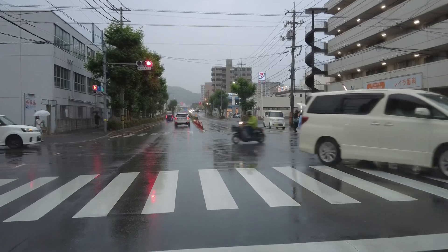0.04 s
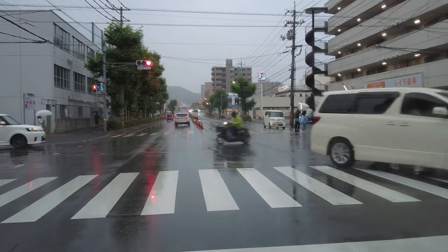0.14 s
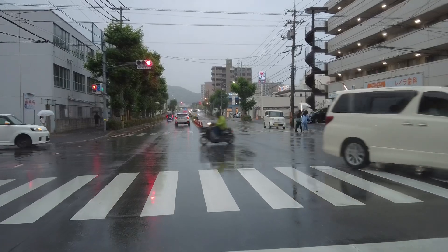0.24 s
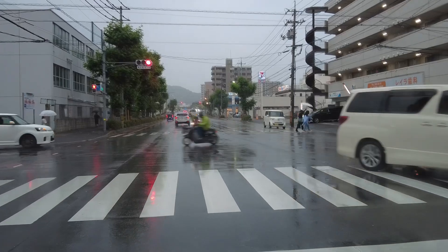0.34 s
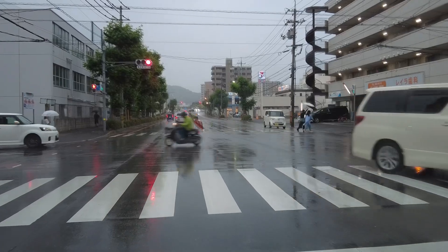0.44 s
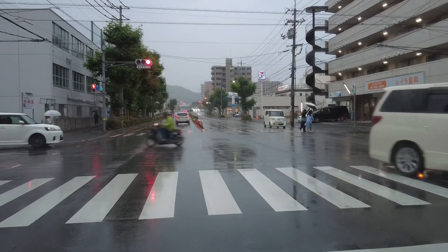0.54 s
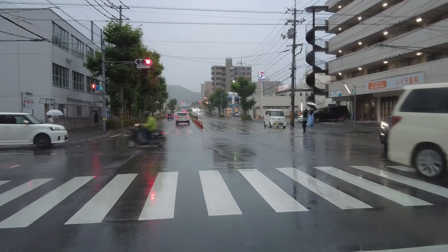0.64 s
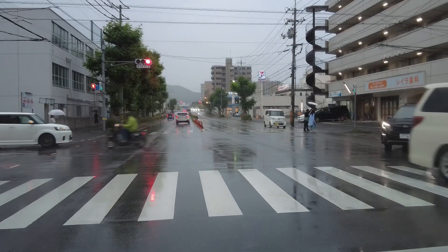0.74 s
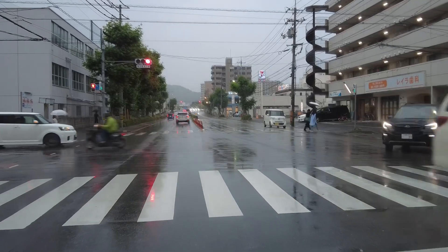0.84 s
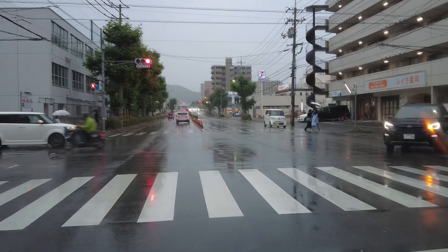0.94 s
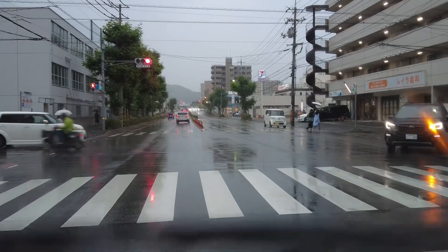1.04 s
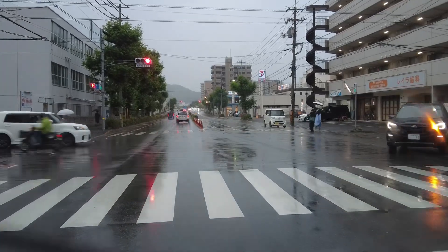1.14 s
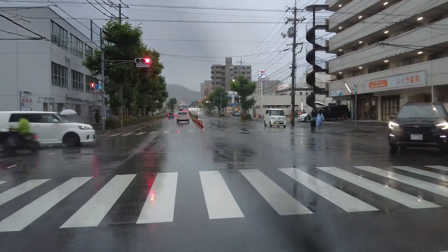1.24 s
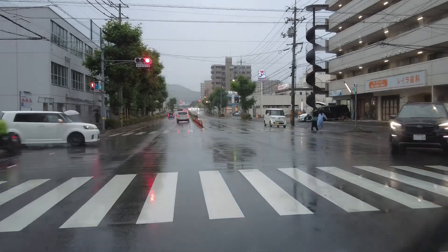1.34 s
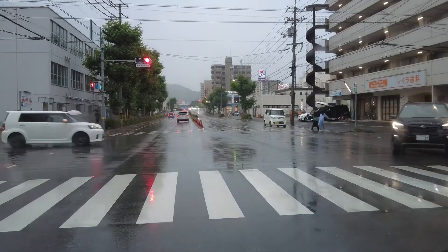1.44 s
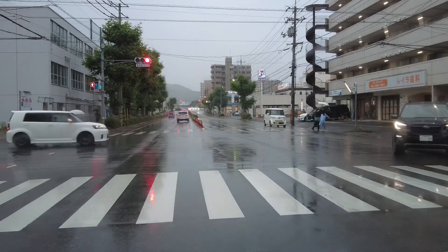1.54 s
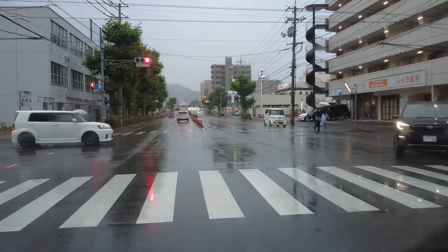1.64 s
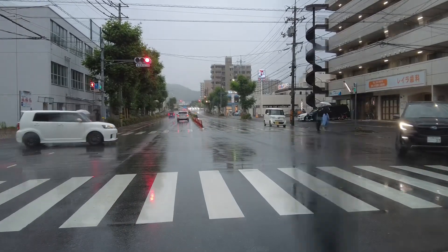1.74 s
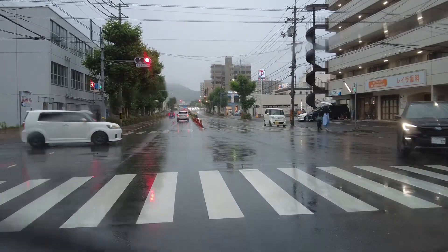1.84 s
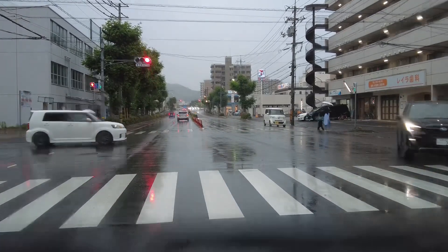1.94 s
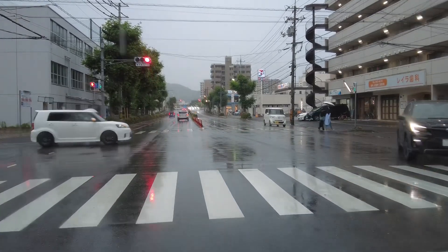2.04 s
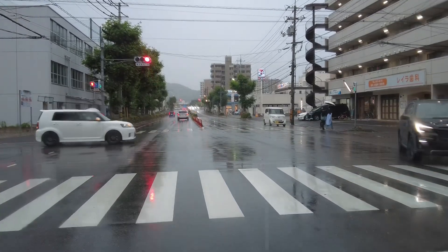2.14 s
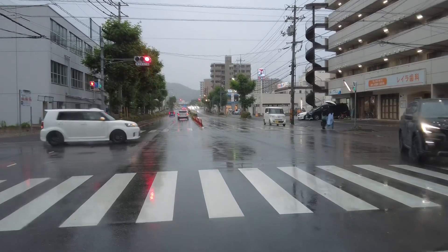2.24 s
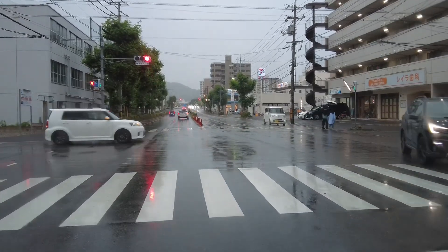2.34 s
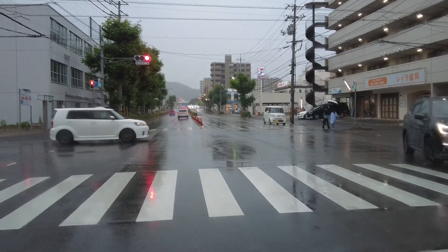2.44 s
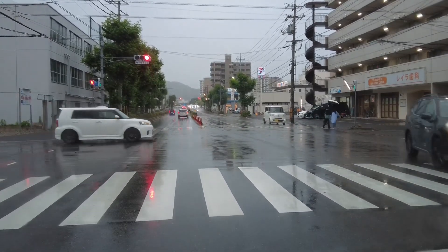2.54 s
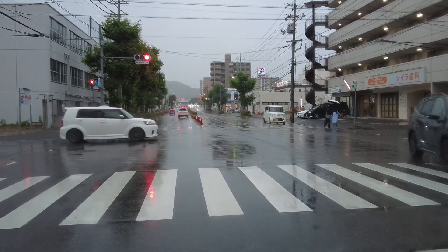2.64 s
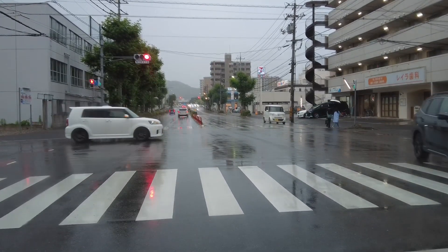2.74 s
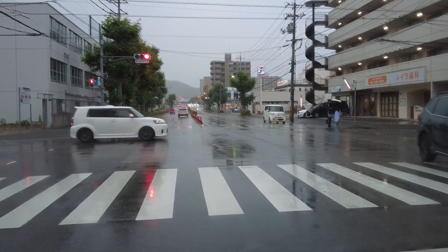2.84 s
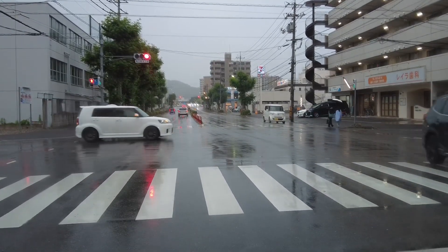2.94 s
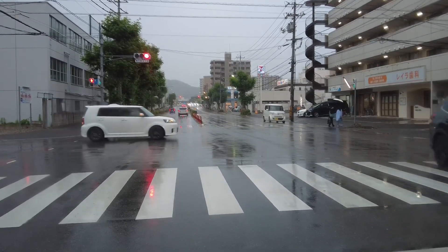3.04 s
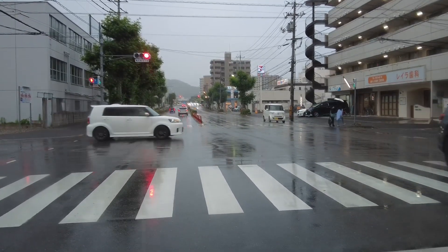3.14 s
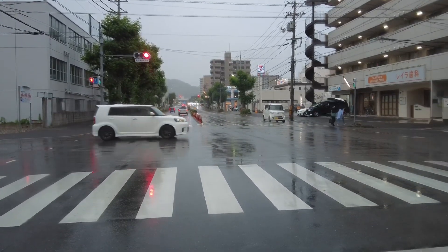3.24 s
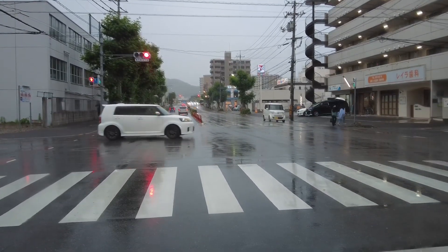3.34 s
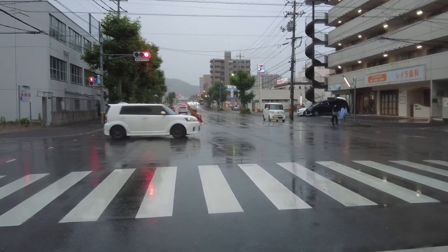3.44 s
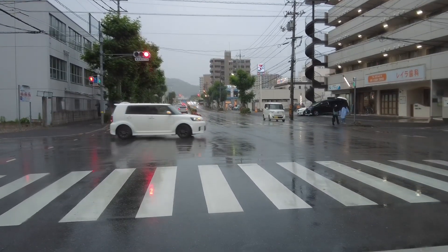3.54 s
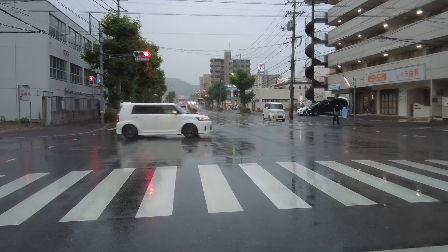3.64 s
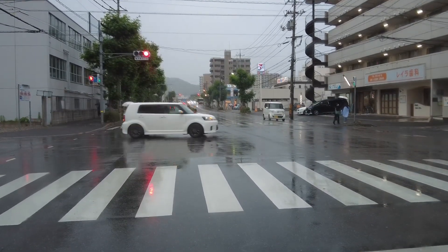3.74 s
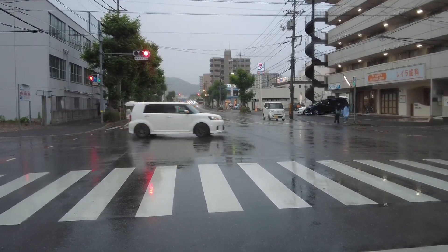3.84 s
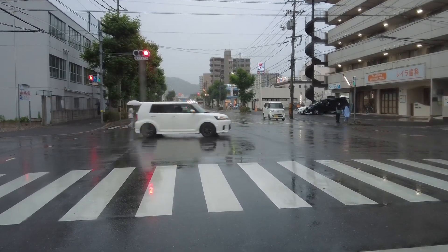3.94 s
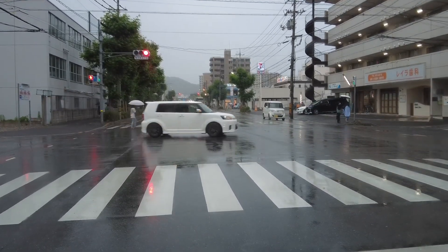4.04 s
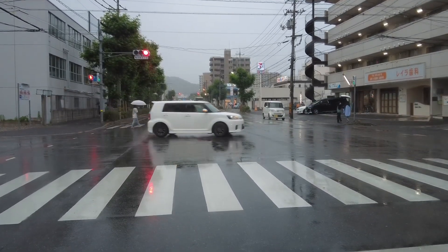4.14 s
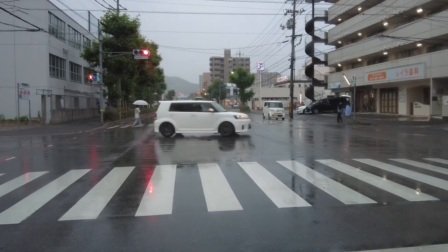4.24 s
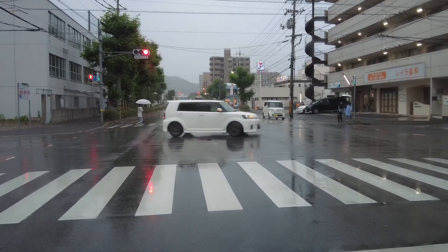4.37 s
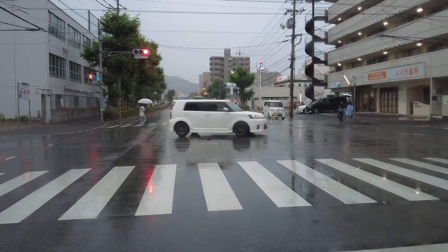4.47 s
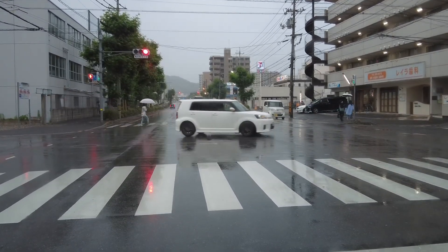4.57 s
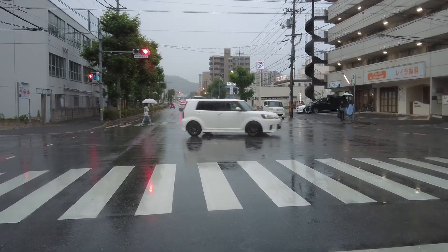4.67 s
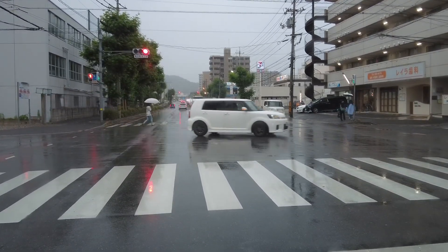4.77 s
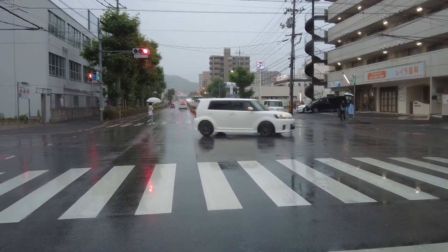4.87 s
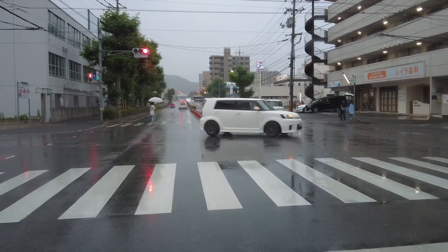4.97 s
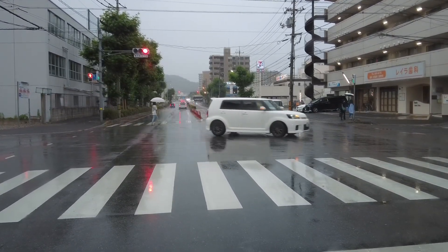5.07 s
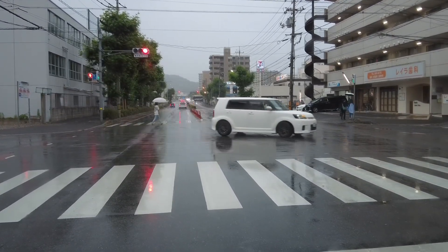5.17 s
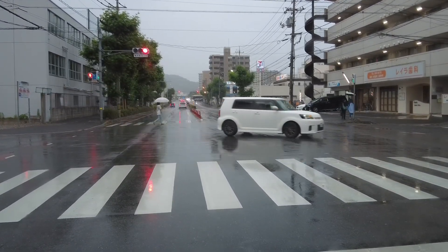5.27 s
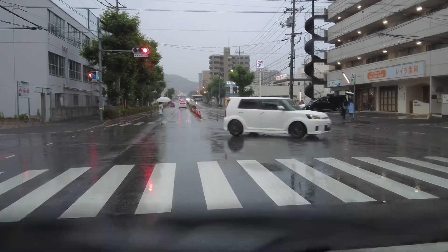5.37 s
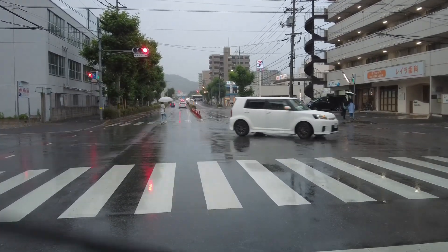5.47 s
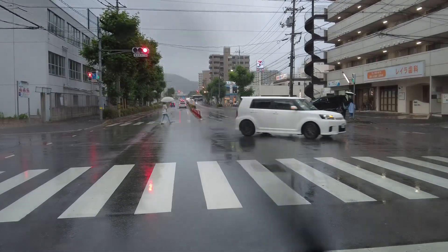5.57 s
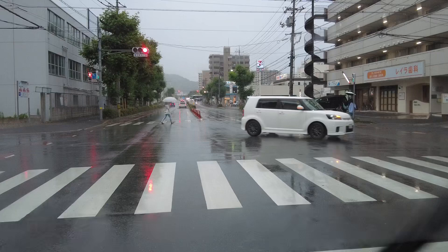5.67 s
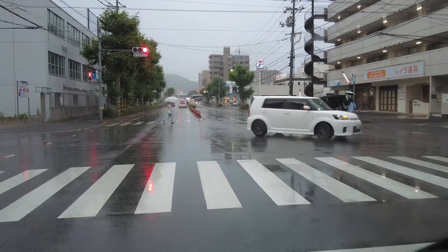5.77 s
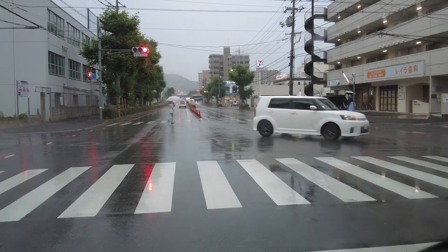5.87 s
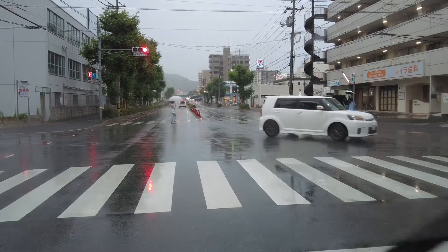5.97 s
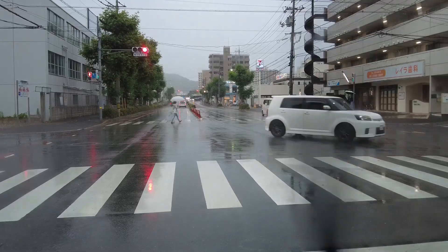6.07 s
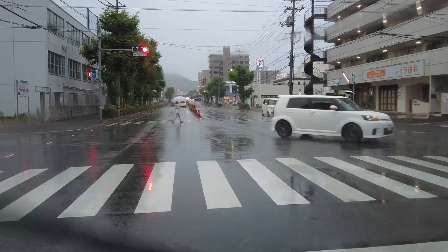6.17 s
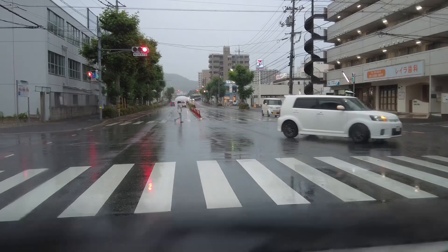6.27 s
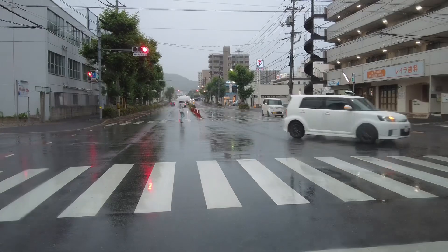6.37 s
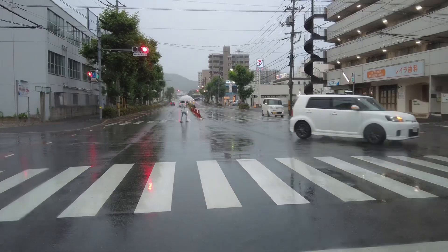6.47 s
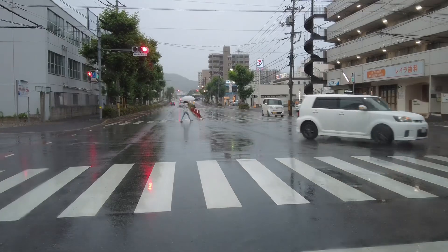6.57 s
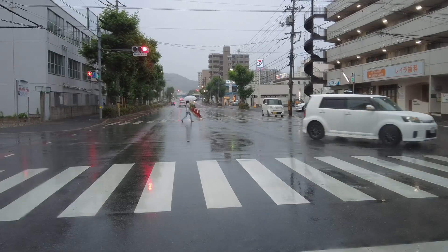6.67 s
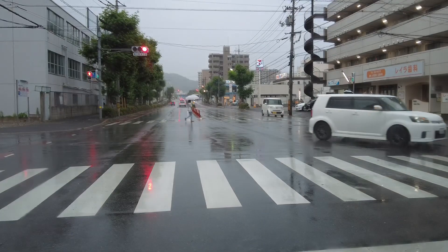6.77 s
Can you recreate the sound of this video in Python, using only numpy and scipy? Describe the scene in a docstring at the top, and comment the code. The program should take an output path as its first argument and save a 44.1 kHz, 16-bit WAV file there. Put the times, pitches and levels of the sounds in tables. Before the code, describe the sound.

Windscreen wipers sweep twice with a motor whine and rubbery knocks, inside an idling car with faint rain outside.

```python
"""Windscreen wipers sweep up and back twice, heard inside a car idling at a wet crossing. Their geared motor
whines, a relay clicks as each sweep starts, the rubber sticks and slips on the glass, and the blades slap and
knock as they lift off, flip over and park, setting glass, cowl and linkage ringing. Underneath, the engine
throbs at harmonics of its firing rate. Rain and tyre hiss come through the glass and one vehicle passes with a
rising tone; later a faint hum swells briefly and a few big drops strike the roof."""
import sys
import numpy as np
from scipy import signal
from scipy.fft import rfft, irfft, next_fast_len
from scipy.io import wavfile

SR = 44100
rng = np.random.default_rng(int(sys.argv[2]) if len(sys.argv) > 2 else 0)


def file_out(sig):
    """Save sig as 16-bit WAV at sys.argv[1]."""
    # one column per channel
    cols = np.atleast_2d(sig).T
    # limit, then scale
    lim = np.clip(cols, -1, 1)
    pcm = np.round(lim * 32767).astype(np.int16)
    wavfile.write(sys.argv[1], SR, pcm)


N = 300321

# rain and wet traffic outside: time_s, rumble_db, hiss_db
OUTSIDE_LEVELS = [(0.0, -50.5, -64), (0.88, -48, -63.5), (2.27, -46, -63), (2.56, -50.5, -63.5),
                  (3.01, -48, -63), (3.8, -50.5, -64.5), (4.4, -50, -64.5), (4.8, -50.5, -65.5),
                  (5.2, -50.5, -65), (6.5, -51, -69), (6.8, -50.5, -65.5)]
# spectra of that rumble and hiss: frequency_hz, density_db
RUMBLE_SPECTRUM = [(65, -41), (95, 6), (110, -12), (126, -13.5), (145, -3), (162, -6.5), (194, -5),
                   (259, -9), (360, -11.5), (416, -19), (594, -16), (1100, -32), (1430, -65), (2420, -120)]
HISS_SPECTRUM = [(800, -6), (1100, -2.5), (1400, 1.5), (1700, -0.5), (2100, -4), (2700, -1.5), (3300, -7.5),
                 (4000, -10), (5000, -13), (6200, -20), (7700, -18.5), (9000, -29), (10000, -21),
                 (11800, -36.5)]
# big drops on the roof: start_s, level_db, pitch_hz, decay_s
ROOF_DROPS = [(3.332, -61, 1500, 0.0057), (3.719, -72, 9200, 0.013), (3.825, -72, 8800, 0.022),
              (4.371, -60.5, 3280, 0.01), (4.372, -68.5, 9000, 0.015), (4.701, -58.5, 3270, 0.012),
              (4.715, -63.5, 2600, 0.012)]
# a passing vehicle, then a faint hum near 235 Hz, probably an overtone of the idling engine:
# start_s, end_s, start_hz, end_hz, level_db
BRIEF_TONES = [(0.097, 0.883, 167, 222.5, -59.5), (2.235, 2.918, 227.2, 237.7, -56.5)]
# cabin air between the engine orders: frequency_hz, density_db
BOOM_SPECTRUM = [(15, -11.5), (24, 5), (34, 4), (45, 3.5), (58, -25.5), (70, -14), (80, -22),
                 (100, -12.5), (120, -39.5), (140, -34)]
# idling engine, slowly settling: time_s, firing_hz, first_order_db, second_order_db
IDLE_CURVE = [(0.0, 23.75, -26, -30.5), (0.58, 23.95, -27.5, -31.3), (1.04, 23.55, -27, -34),
              (1.5, 23.45, -27, -30), (1.96, 23.2, -22, -32), (2.42, 23.25, -23, -30.5),
              (2.88, 22.92, -30, -32), (3.11, 22.97, -25, -32), (3.8, 23.22, -25, -32),
              (4.26, 22.72, -26, -32), (4.72, 22.85, -23.5, -32), (5.18, 22.58, -24.5, -31),
              (5.64, 22.65, -24, -28), (6.1, 22.46, -23.7, -27), (6.81, 22.76, -23.3, -27.5)]
# higher engine orders: multiple, level_db
ENGINE_ORDERS = [(3, -42), (4, -46.5), (6, -55), (8, -64)]
# wiper motor, one list a sweep: time_s, gear_hz, second_db, third_db, fourth_db
MOTOR_RUNS = [
    [(.91, 480, -62, -63, -72), (1.07, 492.3, -89, -65.5, -64.5), (1.18, 506.2, -78, -60.5, -68),
     (1.27, 505.3, -75, -55.5, -87), (1.3, 541.5, -71, -70, -68), (1.48, 561, -54, -61, -69),
     (1.72, 545.5, -62, -63, -71), (1.8, 552, -64, -58.5, -70), (1.95, 572, -58, -60, -71),
     (2.02, 566, -60, -61, -67), (2.13, 578.6, -46.5, -64, -69)],
    [(5.25, 485.4, -68, -63, -72), (5.38, 512, -86, -62.5, -67), (5.48, 487, -70, -59.5, -65),
     (5.61, 505.5, -69, -57.5, -86), (5.64, 549, -77, -77, -64), (5.74, 560.7, -61, -62.5, -69.5),
     (5.92, 562, -67, -62, -76), (6.01, 548, -84, -57, -68), (6.08, 543, -75, -63, -74),
     (6.14, 550, -68, -55, -68.5), (6.28, 570, -64, -61, -69), (6.36, 568, -59, -65, -70),
     (6.465, 560, -47, -56, -82)],
]
# modes of the motor housing: pitch_hz, level_db, t60_s
HOUSING_MODES = [(1313, -69, 0.065), (3500, -79.5, 0.05), (4795, -81, 0.045)]
# one sweep, up and back: time_s, shake_db, drag_db, film_db
SWEEP_LEVELS = [(0.88, -48.5, -32.5, -64), (0.975, -28.5, -42.5, -64), (1.04, -33, -46.5, -63),
                (1.15, -26, -49.5, -62), (1.3, -27.5, -55.5, -63.5), (1.4, -29, -49.5, -59),
                (1.49, -41.5, -46.5, -61.5), (1.64, -19, -36, -62), (1.71, -31, -43.5, -61),
                (1.77, -26, -48, -61.5), (1.96, -30, -45, -60.5), (2.09, -32.5, -46, -60.5),
                (2.15, -27.5, -40, -54), (2.24, -32.5, -54.5, -70)]
# spectra of body shake, rubber drag, water film and wet slap: frequency_hz, density_db
SHAKE_SPECTRUM = [(22, -11.5), (30, 12.5), (38, 1), (50, 4), (62, 1.5), (100, -11), (130, -48)]
DRAG_SPECTRUM = [(71, -39.5), (120, -0.5), (194, 3.5), (241, -8.5), (318, -5), (431, -13), (580, -11),
                 (649, -43.5), (711, -6.5), (1100, -45.5), (1430, -52), (2420, -120)]
FILM_SPECTRUM = [(800, -26), (1100, 1), (1400, -1), (1700, 0.5), (2100, -10.5), (2700, -6), (3300, -14),
                 (4000, -9.5), (5000, -24), (6200, -19), (7700, -19), (9000, -21.5), (10000, -35.5),
                 (11800, -27.5)]
SLAP_SPECTRUM = [(400, -2.5), (1000, 16.5), (2000, 4.5), (3500, -9.5), (6000, -22), (11500, -31)]
# modes of glass, cowl and linkage: pitch_hz, level_db, t60_s
COWL_MODES = [(213.1, -6.5, 0.16), (251, -5.5, 0.14), (293.5, -1.5, 0.2), (350, 4, 0.037),
              (379, 1.5, 0.086), (452, -3.5, 0.12), (582, -1, 0.064), (705.7, 0, 0.073), (818, 3.5, 0.066),
              (1224, 5, 0.048), (1376, 1, 0.04), (1717, -4, 0.038), (1682, -9.5, 0.069),
              (1820, -12.5, 0.069), (2100, -9.5, 0.022), (2300, -1.5, 0.024), (2773, -7.5, 0.045),
              (3250, -7.5, 0.012), (3540, -13, 0.0052), (4330, -14.5, 0.012), (5500, -12, 0.014),
              (7450, -15.5, 0.01), (7860, -8.5, 0.01), (9000, -13.5, 0.01), (10600, -23.5, 0.012)]
# blade and linkage knocks, with a relay click at the start of each sweep (0.904 s and 5.243 s), the last three
# columns relative to the thump: start_s, thump_db, thump_hz, middle_db, bright_db, snap_db
BLADE_KNOCKS = [(0.904, -33, 252.5, -11.5, -30.5, -17.5), (0.965, -38, 269, -1.5, -13.5, -37),
                (1.416, -38.5, 225, -2, -18.5, -29), (1.486, -32.5, 196.5, -6, -14.5, -35.5),
                (1.494, -37.5, 354, 8, -18.5, -28), (1.499, -24.5, 349, -5, -21, -36),
                (1.529, -29, 465, -1, -7, -21.5), (1.536, -28.5, 303, -8.5, -15.5, -27),
                (1.545, -27, 396, -8, -15.5, -28), (1.556, -22.5, 286, -20, -20, -37.5),
                (1.57, -31.5, 288, -18.5, -19, -36), (1.592, -31, 253, -25.5, -28, -38),
                (1.612, -32, 235, -22.5, -19, -28), (1.635, -33.5, 301, -18.5, -32.5, -46.5),
                (1.655, -35, 272, -21, -26.5, -41), (1.679, -32, 295, -25.5, -17.5, -42),
                (1.952, -33, 312, -7.5, -36.5, -29), (2.111, -35.5, 304, -7, -13, -30.5),
                (2.118, -19.5, 205, -14.5, -12, -21.5), (2.122, -19, 383, -16.5, -16, -18.5),
                (2.128, -24, 408, -14.5, -19, -26.5), (2.142, -23.5, 209, -15.5, -25, -36),
                (5.243, -33.5, 250, -13, -30, -16), (5.292, -39, 314, -11, -19.5, -37.5),
                (5.309, -39.5, 263.5, -4, -17.5, -30.5), (5.748, -43, 219, 0, -20, -23.5),
                (5.776, -42, 331, -13, -21.5, -24), (5.822, -38.5, 223, -2, -13.5, -32),
                (5.832, -26, 348, -2.5, -18, -36), (5.838, -24, 347, -6.5, -17, -41),
                (5.851, -32.5, 303, -1.5, -23, -39), (5.867, -31.5, 401, -1, -7, -22),
                (5.875, -29, 332, 0.5, -11, -23), (5.884, -33, 297, -6, -11.5, -25),
                (5.897, -28.5, 246, -11.5, -18, -35.5), (5.91, -26, 261, -16, -18.5, -35.5),
                (5.937, -30, 270, -26.5, -27.5, -42), (5.955, -31.5, 257, -24.5, -26.5, -40),
                (5.977, -36.5, 279, -27.5, -35.5, -40), (6, -39.5, 231, -27, -30.5, -42),
                (6.289, -37, 307, -6.5, -39, -30), (6.457, -21, 214.5, -20, -11, -17),
                (6.461, -21, 380, -17, -12.5, -28), (6.469, -28, 227.5, -15, -15, -30.5),
                (6.481, -22.5, 207.4, -23, -28.5, -43)]
# left-right difference relative to the sum: frequency_hz, gain_db
SIDE_GAIN = [(20, -1), (60, -22.5), (140, -13.5), (220, -17.5), (330, -12.5), (510, -2.5), (770, -2.5),
             (1050, 4), (1300, -6.5), (1820, -5), (2780, -0.5), (4500, 3.5), (8000, -1.5), (11000, 0)]
# interference of left and right in the sum: centre_hz, width_hz, gain_db
SUM_INTERFERENCE = [(1104, 60, -7.5), (1815, 13, 0.5), (7030, 220, -7)]
# left relative to right: frequency_hz, gain_db
BALANCE = [(20, -5.5), (46, -1), (70, -1.5), (200, 0), (700, 1.5), (2000, 0), (5000, 0)]

SWEEP_INTERVAL_S = 4.337


def from_db(db):
    """Decibels to amplitude ratio."""
    return 10 ** (np.asarray(db) / 20)


def unit_rms(x):
    """Normalise to unit mean power."""
    return x / np.sqrt(np.mean(x ** 2) + 1e-20)


def in_time(rows):
    """Interpolate each column linearly at every sample."""
    time_s, *columns = np.transpose(rows)
    return np.array([np.interp(np.arange(N) / SR, time_s, column) for column in columns])


def at_hz(spectrum, hz):
    """Interpolate a spectrum on a log-frequency axis."""
    points_hz, db = np.transpose(spectrum)
    return np.interp(np.log(hz), np.log(points_hz), db)


def during(tables, fade_s):
    """Trapezoidal gate over the time span of each table."""
    t = np.arange(N) / SR
    return sum(np.clip(np.minimum(t - rows[0][0], rows[-1][0] - t) / fade_s, 0, 1) for rows in tables)


def drift(rate_hz):
    """Low-pass noise: a random fluctuation of unit rms."""
    step = 40
    pole = np.exp(-2 * np.pi * step * rate_hz / SR)
    slow = signal.lfilter([1], [1, -2 * pole, pole ** 2], rng.standard_normal(N // step + 2002))[2000:]
    return np.interp(np.arange(N) / step, np.arange(len(slow)), unit_rms(slow))


def ring(force, hz, t60_s):
    """Forced response of a damped oscillator."""
    r, w = from_db(-60 / (t60_s * SR)), 2 * np.pi * hz / SR
    return signal.lfilter([0, np.sin(w)], [1, -2 * r * np.cos(w), r * r], force + 1e-18)


def coloured(x, response):
    """Filter by multiplying the spectrum with a frequency response."""
    size = next_fast_len(N + SR)
    hz = np.maximum(np.arange(size // 2 + 1) * SR / size, 1)
    return irfft(rfft(x, size) * response(hz), size)[..., :N]


def band_shares(spectrum, hz):
    """Power share of each log-spaced band: density times bandwidth."""
    inside = (hz > spectrum[0][0]) & (hz < spectrum[-1][0])
    power = inside * hz * from_db(2 * at_hz(spectrum, hz))
    return power / power.sum()


def band_noise(layers, low_flicker_db=2.5, treble_flicker_db=2.0):
    """Incoherent (spectrum, gain) layers add in power in quarter-octave bands; gives mid and side."""
    edges = 16 * 2 ** np.arange(0, 9.8, 1 / 4)
    centres = np.sqrt(edges[1:] * edges[:-1])
    power = np.array([gain ** 2 for _, gain in layers])
    shares = np.array([band_shares(spectrum, centres) for spectrum, _ in layers])
    white, out = rng.standard_normal((2, 2, N + SR)), np.zeros((2, N))
    for k, hz in enumerate(centres):
        bandpass = signal.butter(2, edges[k:k + 2], "band", fs=SR, output="sos")
        band = unit_rms(signal.sosfilt(bandpass, white[k % 2])[:, SR:])
        flicker_db = low_flicker_db * drift(5) * (hz > 110) if hz < 1000 else treble_flicker_db * drift(26)
        gain = np.sqrt(shares[:, k] @ power) * from_db(flicker_db)
        out += gain * band * [[1], [from_db(at_hz(SIDE_GAIN, hz))]]
    return out


def wet_street():
    """Transmission through the glass: rain and traffic arrive as noise layers of rumble and hiss."""
    rumble_db, hiss_db = in_time(OUTSIDE_LEVELS)
    return [(RUMBLE_SPECTRUM, from_db(rumble_db)), (HISS_SPECTRUM, from_db(hiss_db))]


def roof_drops():
    """Each impact is a burst of narrow-band noise with exponential decay."""
    size = 4000
    out, t = np.zeros(N + size), np.arange(size) / SR
    for start_s, level_db, hz, decay_s in ROOF_DROPS:
        spray, t60_s = rng.standard_normal(size), 6 / hz
        tone = unit_rms(ring(ring(spray, hz, t60_s), hz, t60_s))
        i = round(start_s * SR)
        out[i:i + size] += from_db(level_db) * np.exp(-t / decay_s) * tone
    return out[:N]


def vehicle_and_hum(jitter=0.0041, wobble_db=3.5):
    """Randomly modulated sinusoids: a passing vehicle's rising tone, later a brief faint hum."""
    spans = [[(start, start_hz, db), (end, end_hz, db)] for start, end, start_hz, end_hz, db in BRIEF_TONES]
    hz, level_db = in_time(sum(spans, []))
    phase = 2 * np.pi * np.cumsum(hz * (1 + jitter * drift(28))) / SR
    amplitude = np.sqrt(2) * from_db(level_db - wobble_db * drift(24))
    return amplitude * np.sin(phase) * during(spans, fade_s=0.16)


def cabin_boom(level_db=-34.5):
    """The enclosed air booms: a steady noise layer between the engine orders."""
    return [(BOOM_SPECTRUM, np.full(N, from_db(level_db)))]


def idling_engine(uneven_db=1.2, slip_rad=0.45, drift_hz=1.3):
    """Harmonics of the firing rate; uneven firing modulates the lowest two in opposite senses."""
    firing_hz, first_db, second_db = in_time(IDLE_CURVE)
    phase = 2 * np.pi * np.cumsum(firing_hz) / SR
    swing_db, slip = uneven_db * drift(drift_hz), slip_rad * drift(drift_hz)
    out = from_db(first_db + swing_db) * np.cos(phase + slip)
    out += from_db(second_db - swing_db) * np.cos(2 * phase)
    for multiple, level_db in ENGINE_ORDERS:
        out += from_db(level_db) * np.cos(multiple * phase)
    return -np.sqrt(2) * out


def wiper_motor(jitter=0.009, wobble_db=2.4):
    """Gear-mesh harmonics sag and rise with the load; brush noise excites the housing modes."""
    gear_hz, second_db, third_db, fourth_db = in_time(sum(MOTOR_RUNS, []))
    phase = 2 * np.pi * np.cumsum(gear_hz * (1 + jitter * drift(75))) / SR
    harmonics = (2, second_db), (3, third_db), (4, fourth_db), (6, third_db - 15)
    whine = sum(from_db(db + wobble_db * drift(30)) * np.sin(k * phase) for k, db in harmonics)
    brushes = rng.standard_normal(N)
    housing = sum(from_db(db) * unit_rms(ring(brushes, hz, t60_s)) for hz, db, t60_s in HOUSING_MODES)
    return (whine + housing) * during(MOTOR_RUNS, fade_s=0.0031)


def blade_friction(stick_db=2.5, shudder_db=1.0, grit_db=1.0):
    """Noise layers of rubbing: the body shakes; stick-slip modulates rubber drag and water film hiss."""
    sweeps = [SWEEP_LEVELS, [(time_s + SWEEP_INTERVAL_S, *levels) for time_s, *levels in SWEEP_LEVELS]]
    shake_db, drag_db, film_db = in_time(sum(sweeps, []))
    wiping = during(sweeps, fade_s=0.081)
    stick_slip = from_db(stick_db * drift(14.1))
    shake = wiping * from_db(shake_db + shudder_db * drift(28))
    drag = wiping * stick_slip * from_db(drag_db)
    film = during(MOTOR_RUNS, fade_s=0.0032) * stick_slip ** 0.4 * from_db(film_db + grit_db * drift(90))
    return [(SHAKE_SPECTRUM, shake), (DRAG_SPECTRUM, drag), (FILM_SPECTRUM, film)]


def blade_slaps(relative_db=-8.5, rise_s=0.0048):
    """The impact of wet rubber on glass adds a broadband burst to each knock."""
    size = 2000
    envelope, age = np.zeros(N + size), np.arange(size) / SR / rise_s
    for start_s, thump_db, _, _, bright_db, _ in BLADE_KNOCKS:
        i = round(start_s * SR)
        envelope[i:i + size] += from_db(thump_db + bright_db + relative_db) * age * np.exp(1 - age)
    white, lowest_hz = rng.standard_normal(N), SLAP_SPECTRUM[0][0]
    noise = coloured(white, lambda hz: from_db(at_hz(SLAP_SPECTRUM, hz) - 60 * (hz < lowest_hz)))
    return envelope[:N] * unit_rms(noise)


def blade_knocks(contact_s=0.0034, drive_cycles=5.6, spread_oct=0.26):
    """Modal superposition: short rattling contacts drive the modes of glass, cowl and linkage."""
    size = 600
    out, t = np.zeros(N), np.arange(size) / SR
    contact = t * np.exp(-t / contact_s)   # rubber softens each blow
    for hz, mode_db, t60_s in COWL_MODES:
        force = np.zeros(N + size)
        rattles = ring(rng.standard_normal((len(BLADE_KNOCKS), size)), hz, 3 / hz)
        bursts = rattles * contact * np.exp(-t * hz / drive_cycles)   # high modes feel only the onset
        for knock, burst in zip(BLADE_KNOCKS, bursts):
            start_s, thump_db, thump_hz, middle_db, bright_db, snap_db = knock
            if hz < 520:
                tilt_db = -6 * (np.log2(hz / thump_hz) / spread_oct) ** 2
            else:
                tilt_db = at_hz([(700, middle_db), (1200, bright_db), (1700, bright_db), (6000, snap_db)], hz)
            # the burst's strength at this mode's frequency, kept clear of zero
            strength = np.hypot(abs(burst @ np.exp(2j * np.pi * hz * t)), 0.18 * abs(burst).sum())
            i = round(start_s * SR)
            force[i:i + size] += from_db(thump_db + tilt_db + mode_db) * burst / strength
        out += ring(force[:N], hz, t60_s)
    return out


def scene():
    """Superpose the sources as sum (mid) and difference (side), then form left and right."""
    direct = blade_knocks() + blade_slaps() + wiper_motor() + roof_drops() + vehicle_and_hum()
    # a lag between left and right puts their difference a quarter cycle ahead
    side = coloured(direct, lambda hz: 1j * from_db(at_hz(SIDE_GAIN, hz) - 2))
    noise_mid, noise_side = band_noise(cabin_boom() + wet_street() + blade_friction())
    side += noise_side
    mid = coloured(direct + noise_mid, lambda hz: from_db(
        sum(db / (1 + ((hz - centre) / width) ** 2) for centre, width, db in SUM_INTERFERENCE)))
    mid += idling_engine()
    return np.array([mid + side, mid - side])


def record(dry, cutoff_hz=11900):
    """A level difference weakens the deep bass on the left; the ends fade and the top is cut."""
    stereo = coloured(dry, lambda hz: from_db(np.outer([.5, -.5], at_hz(BALANCE, hz))))
    stereo *= during([[(0,), (N / SR,)]], fade_s=0.004)
    return signal.sosfilt(signal.cheby2(16, 50, cutoff_hz, fs=SR, output="sos"), stereo)


dry = scene()
out = record(dry)
file_out(out)
```